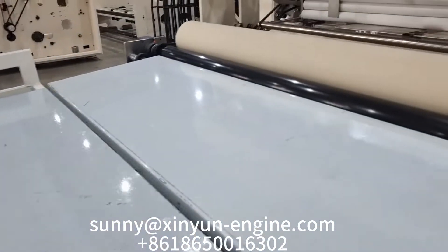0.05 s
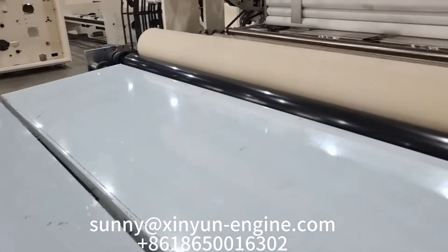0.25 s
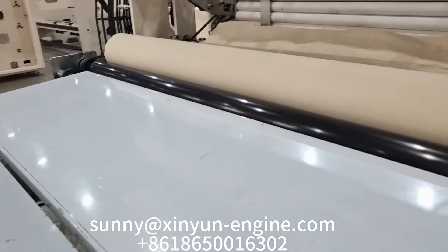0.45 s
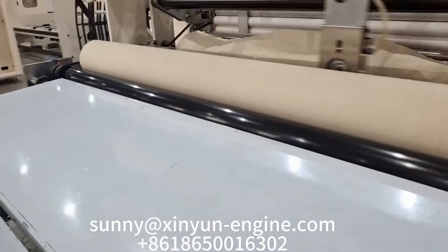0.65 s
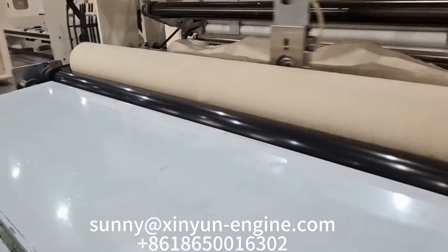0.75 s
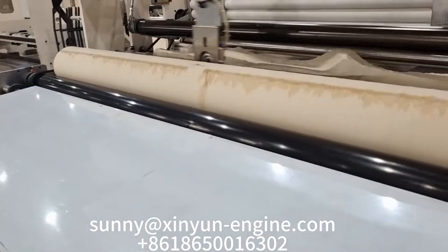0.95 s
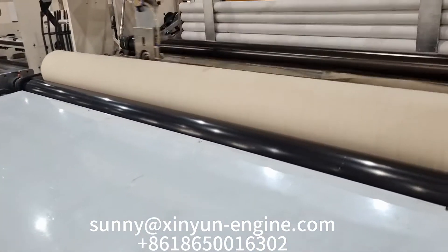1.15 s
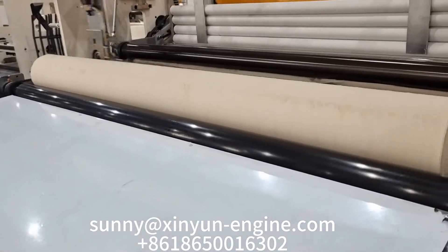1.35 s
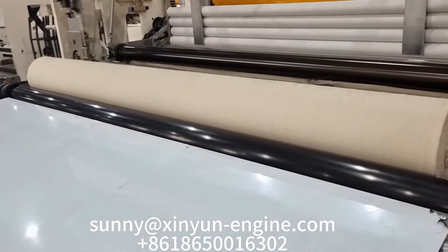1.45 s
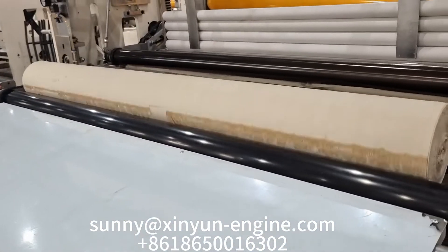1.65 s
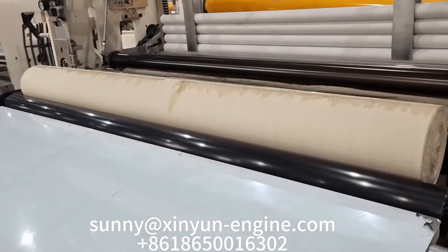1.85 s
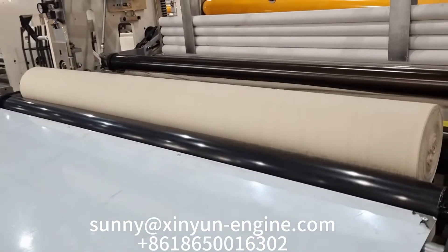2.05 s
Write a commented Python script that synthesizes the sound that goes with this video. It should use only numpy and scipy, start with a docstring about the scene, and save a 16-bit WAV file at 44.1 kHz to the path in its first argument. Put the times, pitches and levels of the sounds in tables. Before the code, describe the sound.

A paper rewinding machine runs throughout, with a wavering motor whine, swishing paper and low workshop rumble. From about 0.25 to 0.7 seconds compressed air hisses, with dull thumps, clanks and a puff near 0.4. The loudest moment comes around 0.8 to 0.95: ringing steel clatter, a roller drone and a sharp puff. A lighter knock follows at 1.35, then faint puffs and paper rasps as the hiss fades.

```python
"""Paper rewinder changing rolls

In a rumbling workshop, motors whine and paper swishes and rasps over droning rollers.
Compressed air hisses and puffs from the valves. The transfer arms clatter against the steel
frame and the finished roll thumps onto the table; each hit rings and echoes in the hall."""
import sys
import numpy as np
from scipy import signal
from scipy.fft import rfft, irfft
from scipy.io import wavfile

SR = 44100
rng = np.random.default_rng(int(sys.argv[2]) if len(sys.argv) > 2 else 0)


def generate_wav(sig):
    """Save sig (samples, or channels by samples) to the path in sys.argv[1] as 16-bit PCM at SR."""
    pcm = np.round(np.clip(np.atleast_2d(sig).T, -1, 1) * 32767).astype(np.int16)
    wavfile.write(sys.argv[1], SR, pcm)


N = 92610
TIME_S = np.arange(N) / SR
FREQ_HZ = np.maximum(np.arange(N // 2 + 1) * SR / N, 1)
FRAME_LAG_S = .00032  # sound from the frame reaches the right ear this much later


def from_db(db):
    """Turn decibels into a number to multiply a sound by."""
    return 10 ** (np.asarray(db) / 20)

def over_time(rows):
    """Join (time, value) rows with straight lines, giving a value for every sample."""
    return np.interp(TIME_S, *np.transpose(rows))

def over_pitch(rows):
    """Join (pitch, value) rows with straight lines, giving every octave equal room."""
    hz, value = np.transpose(rows)
    return np.interp(np.log(FREQ_HZ), np.log(hz), value)

def unit_level(x):
    """Scale a signal so its average power is 1."""
    return x / np.sqrt(np.mean(x ** 2) + 1e-20)

def drift(rate_hz):
    """A smooth random wobble, about 1 in size."""
    smoothing = (1 + (FREQ_HZ / rate_hz) ** 2) ** 2
    return unit_level(irfft(rfft(rng.standard_normal(N)) / smoothing, N))

def place(x, pan_db=0, lag_s=0):
    """Make the left side louder by pan_db and the right side later by lag_s."""
    left, right = x * np.ones((2, 1))
    late_right = np.interp(TIME_S - lag_s, TIME_S, right)
    return np.array([left * from_db(pan_db / 2), late_right * from_db(-pan_db / 2)])

# How alike scattered sound is at the two ears: pitch_hz, likeness (0 to 1)
EAR_LIKENESS = [(60, 1), (250, 0.9), (600, 0), (1200, 0), (2500, 0.36), (5000, 0.3), (14000, 0.12)]

def noise(spectrum, tilt_db=0, direct=0):
    """Shaped stereo noise, tilted by tilt_db per octave; the direct share is alike at both ears."""
    alike = np.clip(direct + (1 - direct) * over_pitch(EAR_LIKENESS), 0, 1)
    shared, opposite = rfft(rng.standard_normal((2, N)))
    ears = np.sqrt(1 + alike) * shared + np.sqrt(1 - alike) * opposite * [[1], [-1]]
    colour = from_db(over_pitch(spectrum) + tilt_db * np.log2(FREQ_HZ))
    return unit_level(irfft(colour * ears, N))

# Tone colour of the hall's background: pitch_hz, relative_db
HALL_COLOUR = [(20, -36), (60, -8.5), (100, -6), (130, -4), (170, -3.5), (240, 3), (300, -3), (420, -10.5),
               (650, -16.5), (800, -9), (1100, -17), (1600, -31), (2800, -38), (4000, -65), (5500, -26.5),
               (9000, -35), (16000, -59)]
# Loudness of the deep rumble: time_s, level_db
RUMBLE_LEVELS = [(0, -44), (.2, -54), (.33, -37), (.42, -43), (.5, -39.5), (.71, -54), (.83, -45),
                 (1.02, -56), (1.12, -39.5), (1.22, -44.5), (1.35, -41), (1.6, -47.5), (1.7, -40),
                 (1.77, -37), (1.85, -41), (2.1, -44.5)]
# Tone colour of the rumble: pitch_hz, relative_db
RUMBLE_COLOUR = [(10, -40), (24, -20), (35, -10), (50, 0.5), (61, 6), (75, 4), (100, -6), (130, -7),
                 (220, -38.5)]

def hall():
    """The hall's steady background noise, over a deep rumble that swells and fades."""
    background = from_db(-37.5) * place(noise(HALL_COLOUR), pan_db=-0.5, lag_s=.00008)
    rumble = from_db(over_time(RUMBLE_LEVELS)) * noise(RUMBLE_COLOUR, direct=0.28)
    return background + rumble

def wavering_tone(hz, left_db, right_db):
    """A motor tone wavers at each ear in the hall's standing waves (its loud and quiet spots)."""
    rate_hz = 4 * np.mean(hz) / 1000  # high tones waver faster
    pitch_hz = hz * (1 + .0005 * drift(rate_hz))
    phase = 2 * np.pi * np.cumsum(pitch_hz) / SR
    ears = [from_db(db + 1.2 * drift(rate_hz)) * np.sin(phase + .45 * drift(rate_hz))
            for db in (left_db, right_db)]
    return np.sqrt(2) * np.array(ears)

# The main drive's speed, heard as the pitch of its whine: time_s, pitch_hz
DRIVE_PITCH = [(0, 1299), (.2, 1285), (.9, 1297), (1.3, 1301), (1.6, 1289), (1.8, 1290), (1.95, 1289),
               (2.1, 1307)]
# Loudness of the whine as the microphone moves through the hall.
# One list each for 1, 2 and 3 times the drive's pitch: time_s, left_db, right_db
WHINE_LEVELS = [
    [(0, -59, -54), (.06, -56, -52.5), (.16, -38, -45), (.21, -56, -44), (.3, -40, -55), (.6, -50.5, -40.5),
     (.72, -47, -65), (1.1, -49, -43.5), (1.27, -59, -43), (1.55, -74, -37.5), (1.73, -64, -40),
     (1.77, -49, -64), (1.82, -33.5, -65), (1.89, -44.5, -47), (1.94, -48, -39.5), (2, -48, -46),
     (2.1, -44, -56)],
    [(0, -55, -44), (.08, -47, -47), (.135, -39, -36), (.21, -44, -38.5), (.25, -44, -45), (.9, -46, -44.5),
     (1.34, -62, -59), (1.385, -41.5, -38), (1.44, -48, -43), (1.5, -74, -60), (1.69, -48, -61),
     (1.77, -41.5, -42), (1.83, -53, -47), (1.865, -44, -40), (1.95, -49, -53), (2.03, -38.5, -50),
     (2.1, -48, -49)],
    [(0, -57, -43.5), (.13, -54, -46), (1.05, -50, -48), (1.3, -61, -45), (1.45, -48, -53),
     (1.52, -44, -52), (1.73, -54, -56), (1.81, -39.5, -37.5), (1.85, -71, -56), (1.915, -50, -35),
     (1.95, -67, -46.5), (2.02, -35, -35.5), (2.04, -48, -43), (2.06, -37, -34), (2.1, -58, -51)],
]
# Tones of the other motors: pitch_hz, level_db
MOTOR_TONES = [(243, -59.5), (781, -57.5), (2465, -53.5), (3914, -56.5), (4931, -61.5), (6433, -67)]

def motors():
    """The main drive whines at a pitch set by its speed; the other motors hold their notes."""
    whine = 0
    for multiple, levels in enumerate(WHINE_LEVELS, 1):
        left_db, right_db = (over_time(np.array(levels)[:, [0, ear]]) for ear in (1, 2))
        whine += wavering_tone(multiple * over_time(DRIVE_PITCH), left_db, right_db)
    others = sum(wavering_tone(hz, db, db) for hz, db in MOTOR_TONES)
    return place(whine, lag_s=.00004) + others

# Loudness of the rollers' drone: time_s, level_db
ROLLER_LEVELS = [(0, -39), (.09, -44), (.2, -34.5), (.34, -46), (.41, -33.5), (.52, -31.5), (.68, -30),
                 (.74, -47), (.86, -11), (.96, -33.5), (1.05, -35), (1.31, -41), (1.4, -35.5), (1.6, -38),
                 (1.72, -46)]
# Tone colour of the drone: pitch_hz, relative_db
ROLLER_COLOUR = [(400, -28), (680, -12), (790, 10), (860, 2), (950, 11.5), (1080, 4), (1250, 5.5),
                 (1600, -31.5)]

def rollers():
    """Turning rollers keep the steel frame droning at its own pitches."""
    drone = place(noise(ROLLER_COLOUR, direct=1.0), pan_db=1.5, lag_s=FRAME_LAG_S)
    return from_db(over_time(ROLLER_LEVELS)) * drone

# Loudness of the sliding paper: time_s, level_db
SWISH_LEVELS = [(0, -43.5), (.14, -43.5), (.27, -32), (.33, -35), (.40, -27.5), (.48, -44), (.67, -36.5),
                (.76, -33.5), (.87, -27), (.97, -33), (1.05, -37.5), (1.33, -41.5), (1.42, -46.5),
                (1.6, -40.5), (1.74, -46.5)]
# Tone colour of its swish: pitch_hz, relative_db
SWISH_COLOUR = [(300, -24), (600, 5), (1200, 7), (1600, 4), (2200, 6.5), (3500, 3.5), (4400, -0.5),
                (6000, -18), (12000, -39.5)]

def paper_swish():
    """Paper swishes as it slides over the rollers."""
    return from_db(over_time(SWISH_LEVELS)) * noise(SWISH_COLOUR)

# Loudness of the air jet: time_s, level_db
JET_LEVELS = [(0, -40), (.19, -40.5), (.24, -32.5), (.255, -22.5), (.30, -26.5), (.35, -26), (.365, -19),
              (.48, -23), (.68, -22.5), (.705, -32), (.90, -34), (.98, -39.5), (1.35, -38), (1.38, -44.5),
              (1.47, -44.5), (1.53, -39), (1.66, -47.5), (1.71, -51), (1.85, -57)]
# Tone colour of its hiss: pitch_hz, relative_db
JET_COLOUR = [(800, -49), (1600, 0.5), (2700, 8), (4000, 5.5), (5200, 5), (6300, 4.5), (8000, -2),
              (9300, 5.5), (10500, 1.5), (11800, 6), (14200, 8.5), (15800, 3)]

def air_jet():
    """Compressed air escapes in a smooth, hissing jet."""
    hiss = from_db(over_time(JET_LEVELS)) * noise(JET_COLOUR, direct=0.083)
    return place(hiss, pan_db=2.5, lag_s=12 / SR)

def hit(start_s, chatter_s, chatter_db):
    """The force of one knock, followed by a dying chatter of small ones."""
    fade = (TIME_S >= start_s) * np.exp(-np.abs(TIME_S - start_s) / chatter_s)
    chatter = unit_level(rng.standard_normal(N) * fade)
    force = from_db(chatter_db) * chatter / np.sqrt(N)
    force[min(int(start_s * SR), N - 1)] += 1
    return force

def ring(force, notes):
    """A force makes an object ring at its own notes; each fades by 60 dB in ring_s seconds."""
    sound = 0
    for hz, db, ring_s in notes:
        decay, angle = from_db(-60 / (ring_s * SR)), 2 * np.pi * hz / SR  # both per sample
        feedback = [1, -2 * decay * np.cos(angle), decay * decay]
        sound += from_db(db) * signal.lfilter([0, np.sin(angle)], feedback, force + 1e-18)
    return sound

def favour(notes, favoured_hz, boost_db=9, width_octaves=.25):
    """Where a hit lands decides which notes ring loudest: those near favoured_hz."""
    return [(hz, db + boost_db * np.exp(-(np.log2(hz / favoured_hz) / width_octaves) ** 2), ring_s)
            for hz, db, ring_s in notes]

def low_cut(x, hz):
    """Weaken the sound below hz: an object gives off little below its own notes."""
    return signal.sosfilt(signal.butter(5, hz, "high", fs=SR, output="sos"), x)

# Dull hits of the roll and its cradle: start_s, relative_db, favoured_hz, bass_gain_db
ROLL_HITS = [(0.2434, -31.5, 233, 2), (0.376, -29, 190, -7), (.391, -30.5, 202, 6), (.799, -39, 350, -15),
             (.855, -23.5, 332, -23), (0.896, -23.5, 259, -24), (0.923, -28, 243, -23),
             (1.025, -37, 245, -16), (1.346, -36.5, 280, -11), (2.092, -33, 232, -8)]
# Notes the table rings at: pitch_hz, relative_db, ring_s
TABLE_NOTES = [(214, -8.5, 0.073), (223, -9, 0.087), (249.3, -6.5, 0.11), (282, -4, 0.099),
               (376.5, 0, 0.13)]
# Boom of the machine's base: pitch_hz, relative_db, ring_s
BASE_NOTES = [(90, -6, .05)]

def roll_thumps():
    """The roll and its cradle thump on the table; some thumps carry a boom from the machine's base."""
    table, base = 0, 0
    for start_s, db, favoured_hz, bass_db in ROLL_HITS:
        force = from_db(db - 2) * hit(start_s, chatter_s=0.018, chatter_db=-2)
        table += ring(force, favour(TABLE_NOTES, favoured_hz))
        base += from_db(bass_db) * ring(force, BASE_NOTES)
    return place(low_cut(table, hz=152) + low_cut(base, hz=26), pan_db=-0.5, lag_s=0.00034)

# Hits of the arms on the frame: start_s, relative_db, chatter_s, favoured_hz
ARM_HITS = [(.2435, -25.5, 0.0058, 1110), (.364, -24, 0.0038, 870), (.376, -17.5, 0.0034, 700),
            (.388, -20, 0.012, 560), (.400, -29, .006, 470), (0.798, -22, 0.0045, 1070),
            (.807, -20.5, 0.0027, 750), (.835, -18.5, 0.0067, 1000), (.8455, -12, 0.0022, 890),
            (.853, -17.5, 0.0031, 1080), (.860, -17.5, 0.0035, 940), (.873, -17.5, 0.0054, 1260),
            (.881, -21.5, 0.0014, 900), (.912, -20, 0.013, 810), (.922, -22, 0.0066, 800),
            (0.937, -22.5, .003, 960), (1.3456, -20, .002, 710), (1.360, -29.5, 0.0025, 710),
            (1.476, -33.5, 0.0055, 940)]
# Notes the steel frame rings at: pitch_hz, relative_db, ring_s
FRAME_NOTES = [(470, -11, 0.14), (540, -21, 0.054), (677, -26.5, 0.27), (787, -14, 0.23),
               (830, -19.5, 0.11), (934, 0.5, 0.057), (960, -10.5, 0.04), (999, -11, 0.045),
               (1005, -5, 0.042), (1108, -10, 0.053), (1300, -11, 0.073), (1322, -15, 0.07),
               (1805, -9, 0.094), (1958, -11.5, 0.08)]

def arm_clatter():
    """The transfer arms strike the steel frame and set it ringing."""
    steel = 0
    for start_s, db, chatter_s, favoured_hz in ARM_HITS:
        force = hit(start_s, chatter_s, chatter_db=1)
        steel += from_db(db - 4) * ring(force, favour(FRAME_NOTES, favoured_hz))
    return place(low_cut(steel, hz=540), pan_db=2.5, lag_s=FRAME_LAG_S)

def echoes(x, level_db=-6, delay_s=.008, ring_s=0.22):
    """The workshop throws back a short blur of echoes, different at each ear."""
    fade = (TIME_S > delay_s) * np.exp(-np.log(1000) * TIME_S / ring_s)
    tail = unit_level(rng.standard_normal((2, N)) * fade) / np.sqrt(N)
    return from_db(level_db) * signal.fftconvolve(x, tail, axes=1)[:, :N]

# Puffs from the valves: start_s, level_db, hold_s, tilt_db_per_octave
VALVE_PUFFS = [(0.352, -18, 0.02, 2), (0.906, -14.5, 0.014, -1), (1.501, -37, 0.0082, 3.5),
               (1.589, -34, 0.0059, -7), (1.641, -34, 0.0062, 0.5)]
# Tone colour of a puff: pitch_hz, relative_db
PUFF_COLOUR = [(200, -33), (500, -12), (1200, 6), (1650, -1), (2600, 2.5), (3700, 2), (4900, -6),
               (6000, -6), (8000, -10), (10000, -10.5), (13000, -1), (16000, -16.5)]
# Notes the exhaust pipe rings at: pitch_hz, relative_db, ring_s
PIPE_NOTES = [(2547, -51, 0.19), (2740, -42, 0.11), (3840, -51.5, 0.16), (6400, -35, 0.025)]

def valve_puffs(opening_s=0.005, fall_db_per_s=526):
    """Valves let out puffs that rise fast, hold and die away, making the exhaust pipe ring."""
    puffs = 0
    for start_s, db, hold_s, tilt_db in VALVE_PUFFS:
        opening = np.clip((TIME_S - start_s) / opening_s, 0, 1)
        fall_db = fall_db_per_s * np.maximum(TIME_S - start_s - hold_s, 0)
        puffs += opening * from_db(db - fall_db) * noise(PUFF_COLOUR, tilt_db)
    return place(puffs + ring(puffs, PIPE_NOTES), pan_db=1.0)

# Rasps of the tightening paper: peak_s, level_db, half_length_s, pitch_hz
PAPER_RASPS = [(.65, -33, 0.064, 3750), (1.12, -42, 0.26, 3200), (1.296, -40, 0.1, 3360),
               (1.61, -41.5, 0.12, 3570)]

def paper_rasps(edge_octaves=0.4, edge_db=-26, roughness_db=2.5):
    """Paper rasps as it is drawn tight: short, rough swells of noise around one pitch."""
    rasps = 0
    for peak_s, db, half_length_s, hz in PAPER_RASPS:
        band = [(hz / 2 ** edge_octaves, edge_db), (hz, 0), (hz * 2 ** edge_octaves, edge_db)]
        swell = np.exp(-2 * ((TIME_S - peak_s) / half_length_s) ** 2)
        rasps += swell * from_db(db + roughness_db * drift(rate_hz=100)) * noise(band)
    return rasps

def scene():
    """The machine in its hall; only the thumps and clatter get echoes."""
    running = hall() + motors() + rollers() + paper_swish() + air_jet()
    hits = roll_thumps() + arm_clatter()
    return running + hits + echoes(hits) + valve_puffs() + paper_rasps()

def record(dry, dip_hz=7380, cutoff_hz=16000):
    """The microphone rounds off peaks, has a narrow dip in the treble and cuts the very top."""
    rounded = np.tanh(dry)
    dipped = signal.lfilter(*signal.iirnotch(dip_hz, Q=26.5, fs=SR), rounded)
    return signal.sosfilt(signal.ellip(12, .1, 80, cutoff_hz, fs=SR, output="sos"), dipped)


dry = scene()
out = record(dry)
generate_wav(out)
```